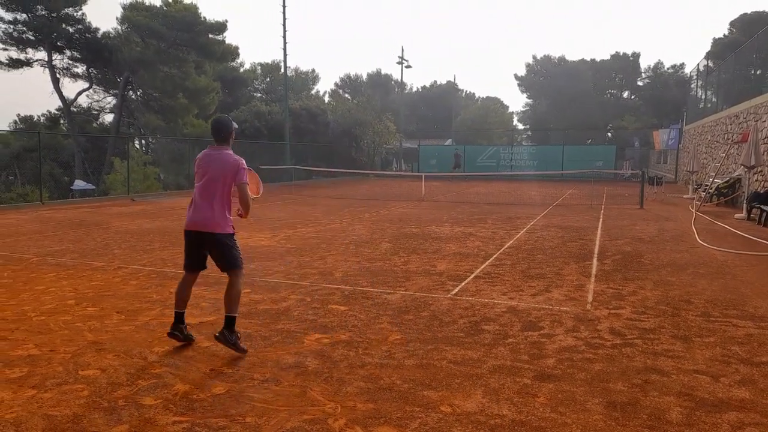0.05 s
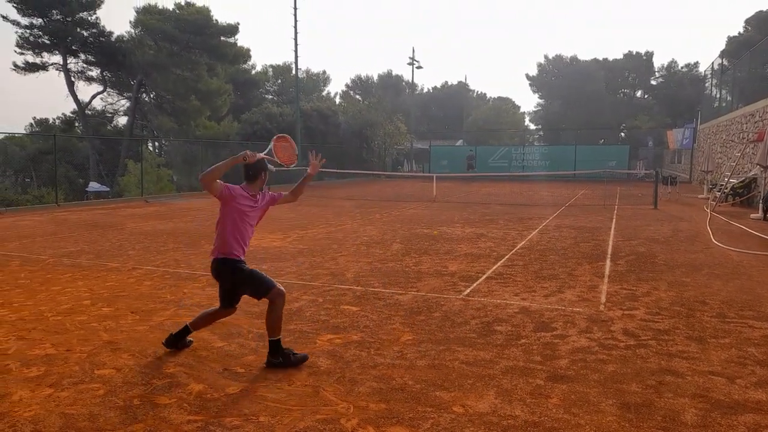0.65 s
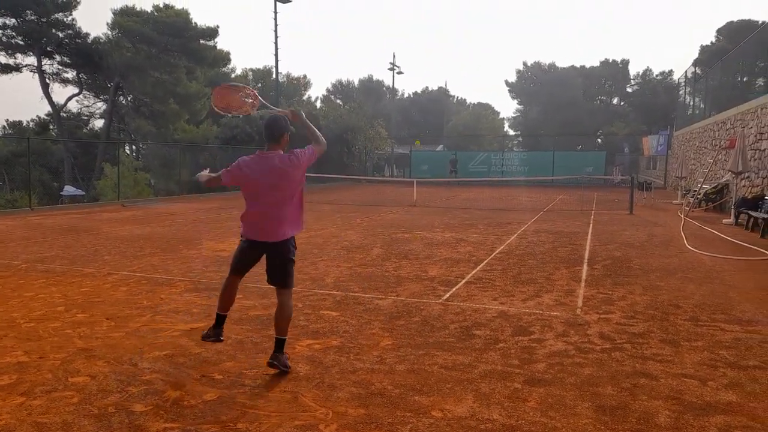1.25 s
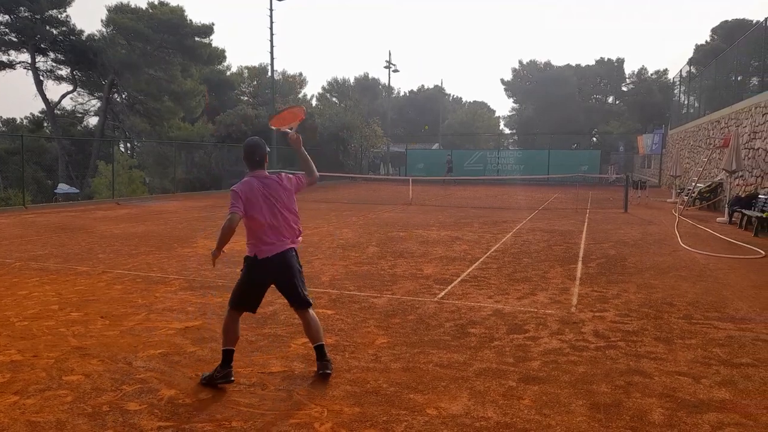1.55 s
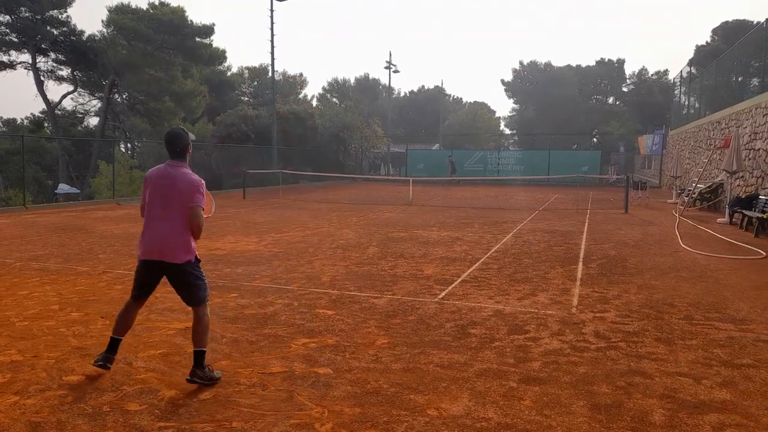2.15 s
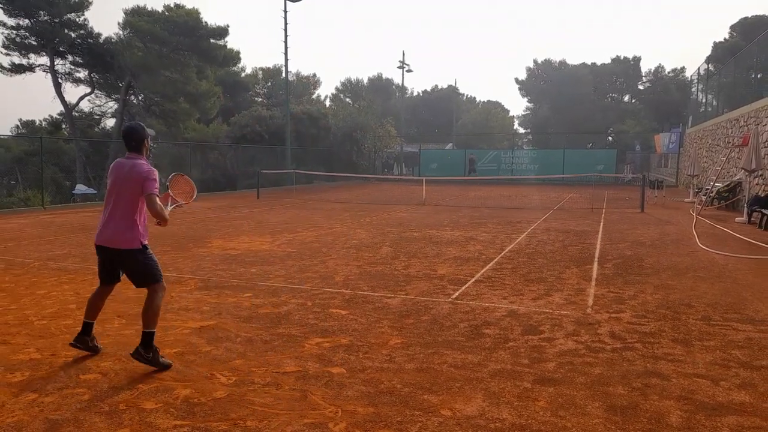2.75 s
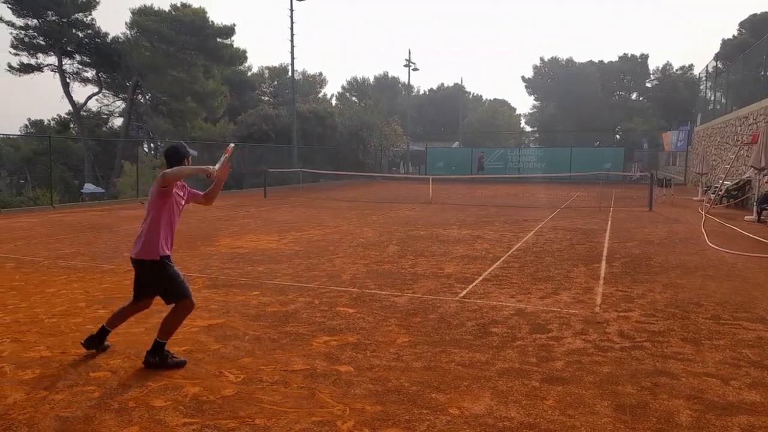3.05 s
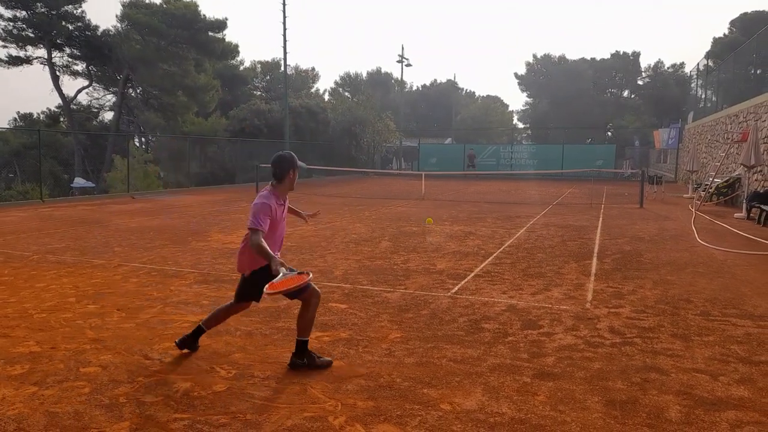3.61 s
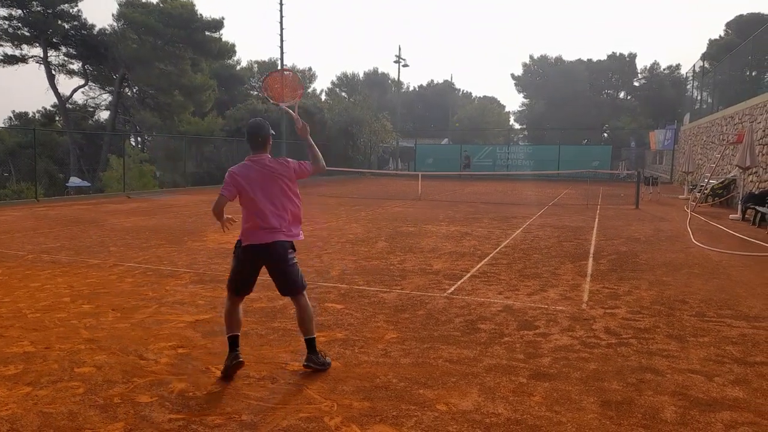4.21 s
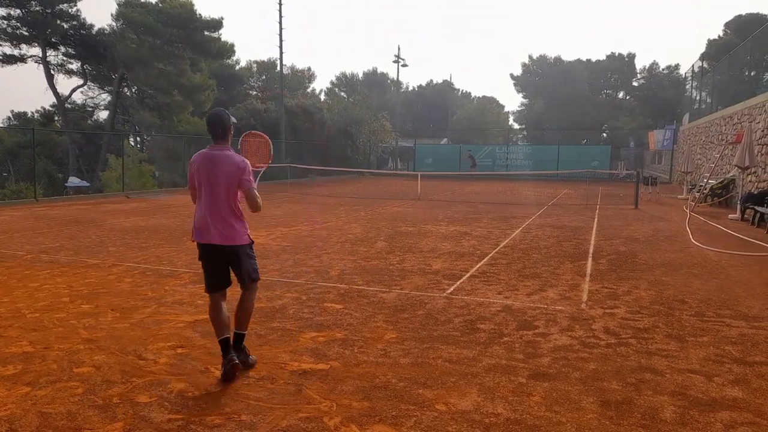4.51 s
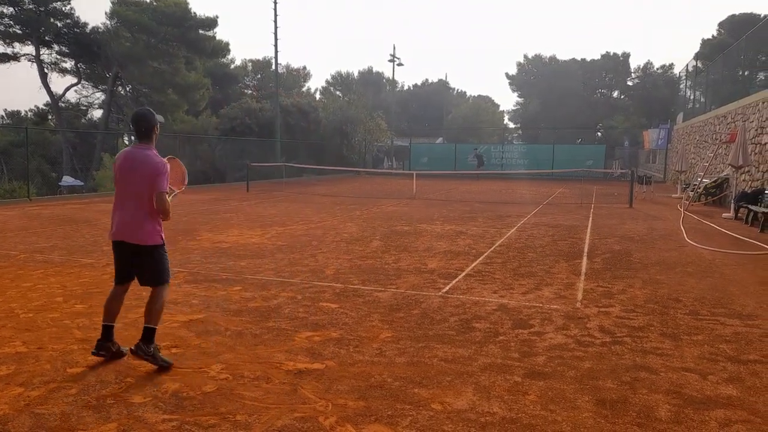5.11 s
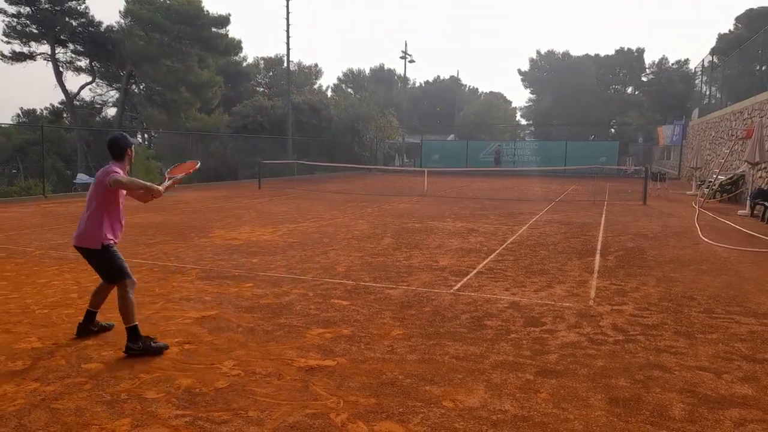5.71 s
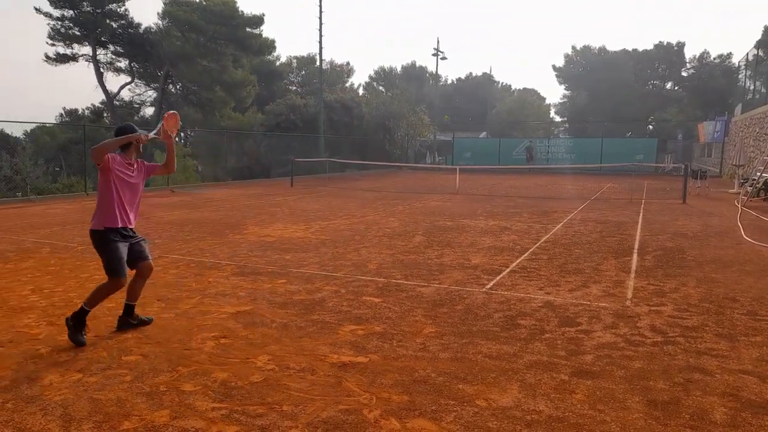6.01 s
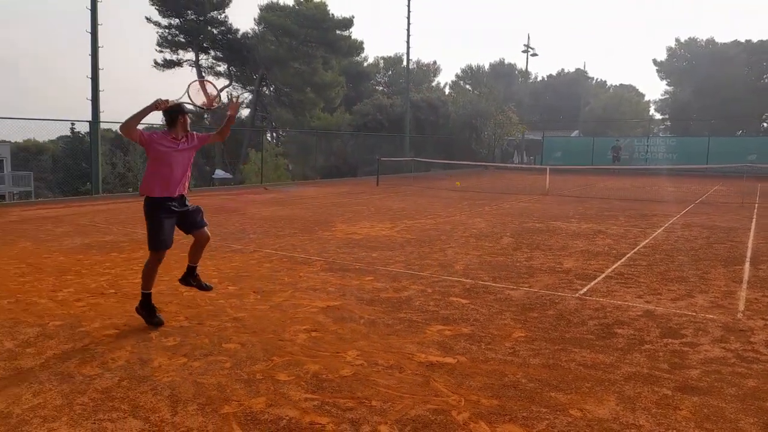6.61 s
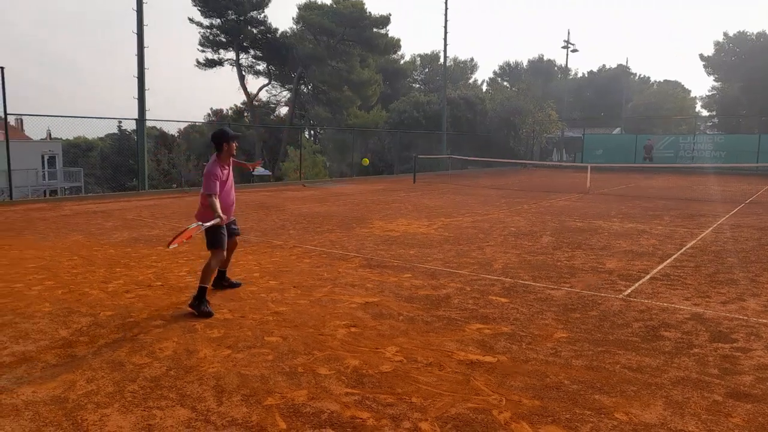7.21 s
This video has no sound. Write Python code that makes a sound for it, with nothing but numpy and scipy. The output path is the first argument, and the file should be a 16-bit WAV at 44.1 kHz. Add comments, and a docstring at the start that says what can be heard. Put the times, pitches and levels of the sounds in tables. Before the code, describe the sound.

Three loud, close pops of racket strings on a tennis ball come a few seconds apart, each preceded by the opponent's rounder, distant hit and a light bounce. The near player's shoes step and slide softly on gritty clay throughout. The microphone sits behind this player on an open court, where the strokes echo briefly off a wall above a faint rumble and low motor hum.

```python
"""A tennis rally on an outdoor clay court, heard from behind the near player.
First the opponent hits from the far end, the ball bounces, and the near racket pops as ball and strings
ring. Two more such exchanges follow, and the last near stroke ends the scene. In between, shoes thud
and slide on the grit, and faint whistles and a hollow rush pass. All along, the wall behind the
baseline throws each blow back, over a dull outdoor rumble and a low motor hum."""
import sys
import numpy as np
from scipy import signal
from scipy.fft import rfft, irfft, next_fast_len
from scipy.io import wavfile

SR = 44100
rng = np.random.default_rng(int(sys.argv[2]) if len(sys.argv) > 2 else 0)


def wrap_up_sound(samples):
    """Save the sound to the file named by the first command line argument, as 16-bit audio."""
    columns = np.atleast_2d(samples).T
    # keep every value between -1 and 1, then stretch to whole-number steps
    tamed = np.clip(columns, -1, 1)
    steps = np.round(tamed * 32767).astype(np.int16)
    wavfile.write(sys.argv[1], SR, steps)


N = 328986
TIME = np.arange(N) / SR
BLOW_TIME = np.arange(SR // 6) / SR
# Levels are relative. A fade time (t60) is how long a sound takes to drop by 60 dB.

# near hits: (time [s], level [dB], body [dB], strings [dB], overtones [dB], crack [dB], echo delay [s])
NEAR_HITS = [(1.2001, 1, 4.5, -5, 0.5, -1, .015), (3.840, 3, 3, -2.5, -4.5, -1, 0.014),
             (7.4312, 1, 0.5, 1.5, 3, -1.5, .0185)]
# tones of pushed-out air, hollow body and higher string ring: (pitch [Hz], level [dB], fade time [s])
PUFF_TONES = [(202, 3.5, 0.016)]
BODY_TONES = [(384, -5, 0.029), (487.3, -4, 0.028), (607.7, -4, 0.031)]
STRING_OVERTONES = [(1105, -14.5, 0.03), (1405, -17, 0.024), (1858, -13, 0.031), (2144, -11, 0.028),
                    (2364, -17, 0.036), (3240, -25, .05), (4190, -22, 0.032)]
STRING_HZ, STRING_T60_S = 774, 0.037
# noise of felt on strings, the swing, and a gritty hiss (also in slides): (frequency [Hz], level [dB])
FELT_NOISE = [(150, -16), (500, 9), (1200, -0.5), (2400, -4), (3400, -11), (5000, -8.5), (7000, -29.5),
              (10000, -8), (15000, -18)]
SWISH_NOISE = [(100, 3), (250, -2.5), (700, -14.5), (2500, -14.5), (6000, -24), (15000, -23.5)]
GRIT_NOISE = [(1500, -28.5), (3000, 3), (4500, 2.5), (5600, -4), (6900, 4), (8000, -10), (9500, -1),
              (11300, 2), (14300, -6), (15500, -17)]
def near_racket():
    """The frame swishes in, felt grazes the strings, air is pushed out, ball and strings ring."""
    out = np.zeros((2, N))
    contact_s = .0032
    for s, db, body_db, strings_db, overtone_db, crack_db, delay_s in NEAR_HITS:
        body = ring(PUFF_TONES, contact_s) + from_db(body_db) * ring(BODY_TONES, contact_s)
        strings = from_db(strings_db) * ring([(STRING_HZ, 0, STRING_T60_S)], contact_s)
        overtones = from_db(overtone_db) * ring(STRING_OVERTONES, contact_s=0.0049)
        felt = from_db(-4.5) * crack(FELT_NOISE, contact_s=0.0044, t60=0.033)
        hiss = from_db(-17) * crack(GRIT_NOISE, contact_s=0.0029, t60=0.024)
        blow = from_db(db) * (body + strings + overtones + from_db(crack_db) * (felt + hiss))
        add(out, with_wall(blow, delay_s, echo_db=-6.5, second_db=-12.5), s)
        swish = noise(SWISH_NOISE, len(BLOW_TIME)) * fade(BLOW_TIME[::-1], t60=0.11)
        add(out, from_db(-37) * swish, s - BLOW_TIME[-1])  # swells up to the hit
    return out


# the opponent's hits: (time [s], level [dB], crack [dB], echo delay [s])
FAR_HITS = [(0.0609, -14.5, 5, .009), (2.7621, -14, 4, 0.0091), (5.2795, -20.5, 0, .0092)]
# tones of the far racket: (pitch [Hz], level [dB], fade time [s])
FAR_TONES = [(176.6, -12, 0.069), (284.6, 3.5, 0.037), (365.6, 0, 0.047), (519, -4.5, 0.025),
             (687, -16, 0.059), (826, -1, 0.021), (990, -11, 0.013), (1587, -12, 0.024), (1770, -10, 0.024),
             (2350, -12, 0.02), (2590, -14, 0.03)]
# its crack: (frequency [Hz], level [dB])
FAR_NOISE = [(150, -62), (500, 14), (1100, 2.5), (2400, -0.5), (4000, -10), (7000, -19.5), (10500, -13),
             (15000, -28)]
def far_racket():
    """Distance leaves a rounder pop, with the wall echo close behind it."""
    out = np.zeros((2, N))
    for s, db, crack_db, delay_s in FAR_HITS:
        pop = ring(FAR_TONES, contact_s=0.004)
        snap = from_db(crack_db - 13) * crack(FAR_NOISE, contact_s=0.0014, t60=0.11)
        add(out, with_wall(from_db(db) * (pop + snap), delay_s, echo_db=-6.5, second_db=-9), s)
    return out


# the ball lands: (time [s], level [dB], crack [dB], echo delay [s])
LANDINGS = [(0.7758, -27, 11.5, .0125), (3.4461, -29, 15, 0.013), (4.836, -34.5, -2.5, 0.0069),
            (6.5791, -26.5, -5, 0.014)]
# tones of the ball: (pitch [Hz], level [dB], fade time [s])
BALL_TONES = [(243, 3, 0.024), (838, -7.5, 0.037), (1290, -8, 0.024), (1400, -16.5, 0.037)]
# its crack on the clay: (frequency [Hz], level [dB])
BALL_NOISE = [(150, -12.5), (700, -7.5), (1400, 6), (2500, -14.5), (5000, -13), (8000, -22), (15000, -23)]
def bounces():
    """The hollow ball strikes the clay with a short puff and a ping."""
    out = np.zeros((2, N))
    for s, db, crack_db, delay_s in LANDINGS:
        ping = ring(BALL_TONES, contact_s=0.00072)
        snap = from_db(crack_db - 6.5) * crack(BALL_NOISE, contact_s=0.00065, t60=0.0036)
        add(out, with_wall(from_db(db) * (ping + snap), delay_s, echo_db=-4, second_db=-14), s)
    return out


# a foot lands: (time [s], level [dB], crack [dB], echo delay [s])
FOOTFALLS = [(0.4887, -29.5, -10, 0.016), (1.5115, -30.5, 2.5, .016), (2.556, -28.5, -5, .015),
             (3.2678, -34, 2.5, .014), (3.778, -54, 13, 0.011), (5.678, -29.5, 2.5, 0.015),
             (6.732, -25, -4.5, 0.026), (6.9142, -36.5, -2.5, 0.018), (7.403, -31.5, 8, 0.019)]
# tones of the thud: (pitch [Hz], level [dB], fade time [s])
SHOE_TONES = [(214, -4.5, 0.0056), (275.6, 2.5, 0.044), (819, -12, 0.07)]
# crack under the sole: (frequency [Hz], level [dB])
SHOE_NOISE = [(100, -7.5), (500, 6), (1400, -3), (3000, -7.5), (6000, -20.5), (15000, -24.5)]
# loose grains of clay tick: (time [s], level [dB])
GRAIN_TICKS = [(.607, -42), (.667, -55), (0.698, -55), (6.996, -49)]
def steps():
    """Soles thud on packed clay and kick up single grains."""
    out = np.zeros((2, N))
    for s, db, crack_db, delay_s in FOOTFALLS:
        thud = ring(SHOE_TONES, contact_s=0.0023)
        crunch = from_db(crack_db - 11) * crack(SHOE_NOISE, contact_s=0.0011, t60=0.05)
        add(out, with_wall(from_db(db) * (thud + crunch), delay_s, echo_db=-16, second_db=-22.5), s)
    bright = [(2000, -32), (6500, -9), (12000, -9), (15000, -22)]
    for s, db in GRAIN_TICKS:
        add(out, from_db(db) * crack(bright, contact_s=0.00045, t60=0.0078), s)
    return out


# a sole slides: (time [s], length [s], time to take the weight [s], drag [dB], scrape [dB], hiss [dB])
SHOE_SLIDES = [ (0.129, .11, 0.037, -52.5, -53.5, -64), (.283, 0.042, 0.018, -52, -61, -68),
               (0.582, 0.13, 0.032, -58.5, -59, -73), (1.032, 0.052, 0.042, -53.5, -63, -64.5),
               (1.398, .11, 0.04, -55.5, -52, -61.5), (1.516, 0.11, 0.027, -80, -59, -73),
               (1.979, .04, 0.017, -50.5, -57.5, -60), (2.011, 0.04, .03, -56, -51.5, -59),
               (2.321, 0.11, 0.063, -58.5, -57, -59), (2.402, .085, 0.044, -49.5, -55.5, -58.5),
               (2.471, 0.12, 0.057, -50.5, -55.5, -51.5), (2.834, 0.057, 0.029, -44, -43.5, -52.5),
               (2.927, 0.14, .012, -54, -60.5, -69.5), (3.135, 0.047, 0.037, -55, -52, -60),
               (3.285, 0.045, 0.014, -43, -37.5, -54.5), (3.395, 0.053, 0.018, -58.5, -48.5, -57),
               (3.433, 0.08, 0.018, -36, -41, -57.5), (3.518, 0.058, 0.029, -44.5, -49, -62),
               (3.712, 0.048, 0.018, -58.5, -70, -65.5), (3.771, 0.069, 0.0087, -55.5, -54.5, -61),
               (4.276, 0.052, .015, -59.5, -55, -67.5), (4.598, 0.078, .03, -61, -60, -63.5),
               (4.929, 0.085, .012, -58, -60.5, -61), (5.041, .17, 0.067, -49.5, -50, -54.5),
               (5.388, 0.054, 0.022, -53, -55, -62.5), (5.511, 0.093, .015, -68, -78, -63.5),
               (5.736, 0.13, 0.077, -50, -46.5, -56.5), (5.881, 0.09, 0.048, -47.5, -46, -62.5),
               (5.966, 0.25, .04, -62, -67.5, -59), (6.034, 0.011, 0.0068, -48.5, -55, -57),
               (6.227, 0.14, .04, -62, -66, -69), (6.731, 0.12, 0.016, -56.5, -65, -74),
               (7.287, 0.089, 0.071, -57, -52.5, -58), ]
# dull drag and brighter scrape on clay: (frequency [Hz], level [dB])
DRAG_NOISE = [(100, -12.5), (250, -2.5), (500, -7.5), (750, 3.5), (1300, -7.5), (2000, -16.5), (4000, -30),
              (15000, -54)]
SCRAPE_NOISE = [(400, -23.5), (1000, -8), (1600, 1.5), (2700, -5.5), (3800, -8.5), (6000, -21),
                (15000, -34)]
SLOWING_DB, STOP_T60_S, SLIP_DB = 3, 0.16, 2
def slides():
    """A sole takes the weight, drags and scrapes in uneven slips, slows, then stops or lifts."""
    gains = np.zeros((3, N))
    for s, length_s, press_s, *levels_db in SHOE_SLIDES:
        t = TIME[TIME < length_s + STOP_T60_S]
        slowing = from_db(-SLOWING_DB * (t / length_s) ** 2)
        stopping = fade(np.maximum(t - length_s, 0), STOP_T60_S)
        weight = rise(t, press_s)
        pressure = np.array([weight, weight, weight ** .7])  # grit hisses even under a light foot
        add(gains, from_db(levels_db)[:, None] * slowing * stopping * pressure, s)
    drag_gain, scrape_gain, hiss_gain = gains
    slips = from_db(SLIP_DB * wander(TIME, np.arange(0, TIME[-1], .009)))
    drag = drag_gain * noise(DRAG_NOISE, N, grain_db=4.5)
    scrape = from_db(-0.5) * scrape_gain * noise(SCRAPE_NOISE, N, grain_db=0.5)
    hiss = from_db(2.5) * hiss_gain * noise(GRIT_NOISE, N, grain_db=4.5)
    return slips * (drag + scrape) + hiss


def with_wall(blow, delay_s, echo_db, second_db):
    """The back wall returns a blow as a duller thump, and a second face of the wall follows."""
    out = blow.copy()
    wall = [(150, -3), (350, 1.5), (550, -7.5), (800, -9.5), (1300, -7.5), (3000, -7.5), (12000, -21)]
    thump = colour(blow, wall)
    add(out, from_db(echo_db) * thump, delay_s)
    add(out, from_db(second_db) * thump, delay_s + .0082)
    return out


# early and late sound scattered by wall and trees: (frequency [Hz], level [dB])
EARLY_WASH = [(120, -21.5), (350, -18.5), (800, -18), (1500, -8.5), (3000, -6.5), (6000, -9.5),
              (15000, -11)]
LATE_WASH = [(100, -20), (300, -17.5), (800, -19), (1500, -19), (3000, -10), (6000, -13.5), (15000, -22)]
# how long the late part lasts: (frequency [Hz], fade time [s])
LATE_FADE = [(120, 1), (320, 0.27), (840, 0.55), (2200, 0.49), (6000, 0.21), (14000, 0.32)]
# echoes from farther walls: (delay [s], level [dB])
FAR_WALLS = [(.087, -22.5), (0.112, -21), (.138, -42.5)]
def court_echoes(x):
    """Rough stone and trees scatter the sound into a soft wash; farther walls give dull echoes."""
    wash, out = np.zeros((2, N)), np.zeros((2, N))
    hisses = [noise([(100, 0), (15000, 0)], N) for _ in range(2)]
    edges_hz = np.geomspace(100, 17000, 14)
    for k, (low, high) in enumerate(zip(edges_hz, edges_hz[1:])):
        band = signal.butter(2, [low, high], "band", fs=SR, output="sos")
        hz = np.sqrt(low * high)
        power = np.mean(signal.sosfilt(band, x + 1e-18) ** 2, axis=0)
        early = from_db(at_hz(EARLY_WASH, hz)) ** 2 * lingering(power, t60=0.073)
        late = from_db(at_hz(LATE_WASH, hz)) ** 2 * lingering(power, at_hz(LATE_FADE, hz))
        wash += np.sqrt(early + late) * rms_one(signal.sosfilt(band, hisses[k % 2]))
    add(out, wash, .012)
    dull = colour(x, [(400, -5), (1000, -9), (8000, -17.5)])
    for delay_s, db in FAR_WALLS:
        add(out, from_db(db) * dull, delay_s)
    return out


def small_echoes(x, count=40):
    """Posts, benches and stones each send back a weak copy, so the ring of a blow lingers."""
    echoes = np.zeros((2, SR // 4))
    for delay_s, across, sign in rng.uniform([.02, -1, -1], [.2, 1, 1], (count, 3)):
        for channel, side in enumerate((1, -1)):
            arrival_s = delay_s + side * across * COURT_LAG_S
            echoes[channel, round(arrival_s * SR)] += np.sign(sign) * fade(delay_s, t60=0.34)
    returned = colour(x, [(150, -9.5), (400, -8), (850, -1.5), (1200, 0), (2000, -1.5),
                          (4500, -2.5), (8000, -3), (15000, -7.5)])
    return from_db(-19) * signal.fftconvolve(returned, echoes, axes=1)[:, :N]


# swells of the distant rumble: (time [s], level [dB])
RUMBLE_SWELLS = [(0.0, -50.5), (0.22, -51), (1.09, -57), (1.3, -49.5), (2.27, -60), (2.58, -52),
                 (3.36, -55.5), (3.71, -61), (4.02, -53.5), (4.84, -58.5), (5.71, -52.5), (6.43, -59.5),
                 (6.86, -51.5), (7.4, -58)]
# its deep noise: (frequency [Hz], level [dB])
RUMBLE_NOISE = [(15, -42), (25, -12.5), (55, -12.5), (136, 1), (233, -1.5), (322, -4), (410, -13.5),
                (741, -13), (1270, -20.5), (2360, -23), (3630, -30.5), (6730, -42.5), (7700, -48),
                (11500, -34.5), (15500, -57.5)]
def outdoors():
    """The surroundings rumble in slow swells, over a faint steady hiss."""
    rumble = from_db(np.interp(TIME, *np.transpose(RUMBLE_SWELLS)) + 1) * noise(RUMBLE_NOISE, N)
    steady_hiss = noise([(100, -2), (900, 6), (1700, 10.5), (2900, 7),
                 (4000, -38.5), (8000, -21.5), (15000, -12)], N)
    return rumble + from_db(-70) * steady_hiss


# swells of the motor's hum: (time [s], level [dB])
HUM_SWELLS = [(0.0, -73), (1.44, -56), (2.35, -68), (3.58, -68.5), (4.61, -58), (5.54, -65), (6.28, -56.5),
              (7.4, -55.5)]
HUM_HZ, HUM_WAVER_HZ = 61, 1.6
def motor_hum():
    """A far-off motor hums on one low, wavering tone."""
    pitch_hz = HUM_HZ + HUM_WAVER_HZ * wander(TIME, np.linspace(0, TIME[-1], 30))
    return from_db(np.interp(TIME, *np.transpose(HUM_SWELLS)) + 2) * tone(pitch_hz)


# a hollow-sounding noise: (frequency [Hz], level [dB])
RUSH_NOISE = [(450, -30), (700, -5), (850, -3), (1100, -15), (1500, -28), (4000, -56)]
def hollow_rush(start_s=5.535, rise_s=0.066, fall_s=0.047, db=-43.5):
    """A brief rush of noise swells and stops."""
    out = np.zeros((2, N))
    t = TIME[TIME < rise_s + fall_s]
    swell = rise(t, rise_s) * rise(t[-1] - t, fall_s)
    add(out, from_db(db) * swell * noise(RUSH_NOISE, N)[:, :len(t)], start_s)
    return out


# squeaks of a sole or a far-off bird: (time [s], length [s], pitch [Hz], level [dB])
WHISTLE_NOTES = [(.35, .1, 3010, -65), (1.736, 0.18, 1680, -64.5), (4.348, 0.26, 1700, -67)]
def whistles(sink_hz_per_s=274, waver_hz=25.8):
    """Thin whistles waver and sink a little."""
    out = np.zeros((2, N))
    for s, length_s, hz, db in WHISTLE_NOTES:
        t = TIME[TIME < length_s]
        pitch_hz = hz - sink_hz_per_s * t + waver_hz * wander(t, np.arange(0, 1, .008))
        add(out, from_db(db) * np.sin(np.pi * t / length_s) * tone(pitch_hz), s)
    return out


def ring(tones, contact_s):
    """Fading tones that build up while the contact lasts, a little different on each blow."""
    t = BLOW_TIME
    ringing = sum(from_db(db + rng.normal(0, 0.41)) * np.sin(2 * np.pi * hz * t) * fade(t, t60)
                  for hz, db, t60 in tones)
    return rise(t, contact_s) * ringing


def crack(spectrum, contact_s, t60):
    """A burst of noise from felt, strings or grit being crushed."""
    return noise(spectrum, len(BLOW_TIME)) * rise(BLOW_TIME, contact_s) * fade(BLOW_TIME, t60)


# how alike the two microphones hear a noise: (frequency [Hz], likeness [1 = same, 0 = unrelated])
SIDE_LIKENESS = [(100, 1), (350, 0.81), (750, 0.5), (1300, -0.05), (2500, 0), (15000, 0)]
def noise(spectrum, size, grain_db=0):
    """Stereo noise of strength 1, alike on both sides in the bass only; grain_db makes it gritty."""
    padded = 2 * next_fast_len(size // 2 + 1)
    hz = np.fft.rfftfreq(padded, 1 / SR)
    white = rng.standard_normal((2, padded))
    grains = from_db(grain_db * np.minimum(rng.exponential(1, padded), 5))
    mid, side = rfft(white * grains)
    alike = at_hz(SIDE_LIKENESS, hz)
    pair = np.sqrt(1 + alike) * mid + np.sqrt(1 - alike) * side * [[1], [-1]]
    return rms_one(irfft(pair * from_db(at_hz(spectrum, hz)))[:, :size])


def colour(x, spectrum):
    """Turn frequencies up or down by a list of (frequency [Hz], level [dB])."""
    size = 2 * next_fast_len(x.shape[-1] // 2 + SR // 20)
    gain = from_db(at_hz(spectrum, np.fft.rfftfreq(size, 1 / SR)))
    cepstrum = irfft(np.log(gain))
    # fold the filter so that it rings only after a sound, never before
    cepstrum[1:size // 2] *= 2
    cepstrum[size // 2 + 1:] = 0
    return irfft(rfft(x, size) * np.exp(rfft(cepstrum)))[..., :x.shape[-1]]


def lingering(power, t60):
    """Energy that is stored and slowly leaks away."""
    keep = fade(2 / SR, t60)
    return signal.lfilter([1 - keep], [1, -keep], power + 1e-18)


def lagged(x, left_lag_s):
    """Delay the left side against the right."""
    at = np.arange(x.shape[-1])
    shift = left_lag_s * SR / 2
    return np.array([np.interp(at - shift, at, x[0]), np.interp(at + shift, at, x[1])])


def tone(pitch_hz):
    """A pure tone that follows a changing pitch."""
    return np.sin(2 * np.pi * np.cumsum(pitch_hz) / SR)


def wander(t, turns_s):
    """Glide from one random value to the next."""
    return np.interp(t, turns_s, rng.standard_normal(len(turns_s)))


def from_db(db):
    """Turn decibels into a gain."""
    return 10 ** (np.asarray(db) / 20)


def rms_one(x):
    """Scale to an average strength (rms) of 1."""
    return x / np.sqrt(np.mean(x ** 2) + 1e-20)


def at_hz(points, hz):
    """Read between a table's rows, with octaves evenly spaced."""
    table = np.array(points)
    return np.interp(np.log(np.maximum(hz, 1)), np.log(table[:, 0]), table[:, 1])


def fade(t, t60):
    """Die away by 60 dB every t60 seconds."""
    return np.exp(-np.log(1000) * t / t60)


def rise(t, seconds):
    """A smooth step from 0 to 1."""
    return np.sin(np.pi / 2 * np.clip(t / seconds, 0, 1)) ** 2


def add(out, sound, s):
    """Mix a sound in from time s on."""
    start = max(round(s * SR), 0)
    part = sound[..., :max(out.shape[-1] - start, 0)]
    out[..., start:start + part.shape[-1]] += part


# how much later blows and slides reach the left microphone (below zero: earlier)
COURT_LAG_S, FEET_LAG_S = .0001, -0.000097
def scene():
    """Blows and footwork echo around the court, over the background."""
    bass_cut = signal.butter(2, 105, "high", fs=SR, output="sos")  # small things give little deep bass
    blows = signal.sosfilt(bass_cut, near_racket() + far_racket() + bounces() + steps() + 1e-18)
    play = lagged(blows, COURT_LAG_S) + lagged(slides(), FEET_LAG_S)
    echoes = from_db(-1) * court_echoes(play) + small_echoes(play)
    return play + echoes + outdoors() + motor_hum() + hollow_rush() + whistles()


# what each microphone boosts or dulls: (frequency [Hz], level [dB])
LEFT_COLOUR = [(25, -5), (60, 2.5), (130, 2.5), (700, 1), (1300, 0.5), (2400, 4.5), (3400, 0.5),
               (5000, -12), (6200, -23.5), (8000, -23), (10000, -7.5), (15000, -17.5)]
RIGHT_COLOUR = [(25, -10), (60, 1), (130, 1.5), (700, -0.16), (1300, 2), (2400, -4), (3400, -1.5),
                (5000, 2.5), (8000, 1), (15000, 3)]
CUTOFF_HZ = 15700
def record(dry):
    """The left microphone is muffled; peaks are rounded and the highest treble is cut."""
    heard = np.array([colour(dry[0], LEFT_COLOUR), colour(dry[1], RIGHT_COLOUR)])
    treble_cut = signal.ellip(10, .1, 80, CUTOFF_HZ, fs=SR, output="sos")
    return signal.sosfilt(treble_cut, np.tanh(heard))


dry = scene()
out = record(dry)
wrap_up_sound(out)
```